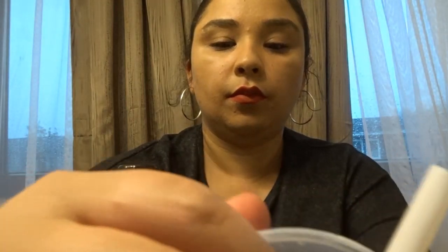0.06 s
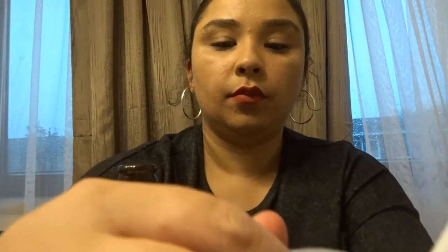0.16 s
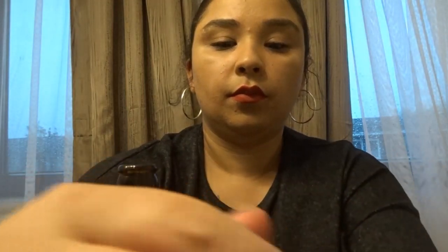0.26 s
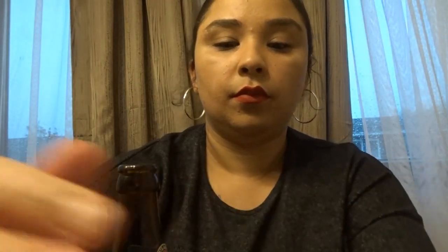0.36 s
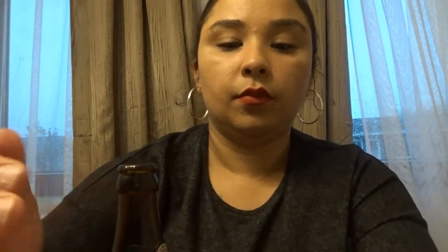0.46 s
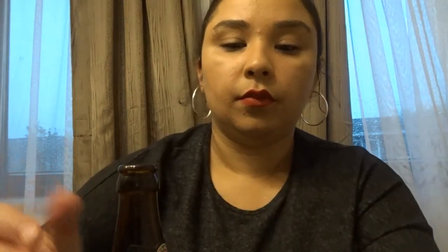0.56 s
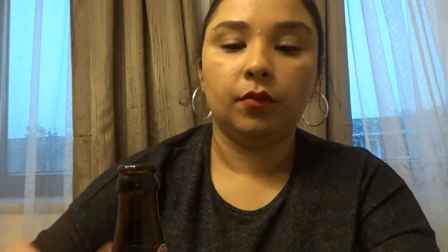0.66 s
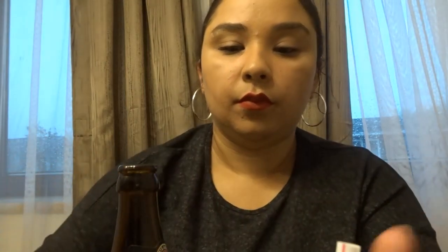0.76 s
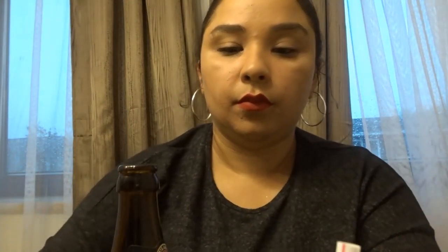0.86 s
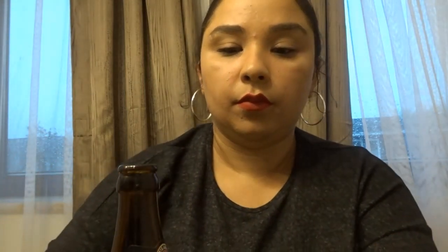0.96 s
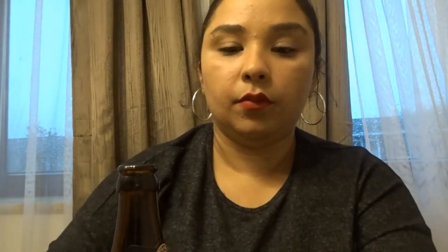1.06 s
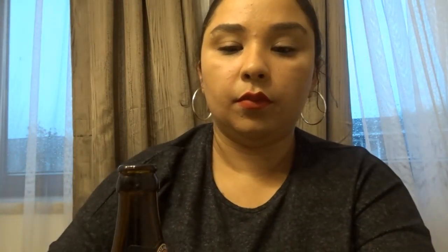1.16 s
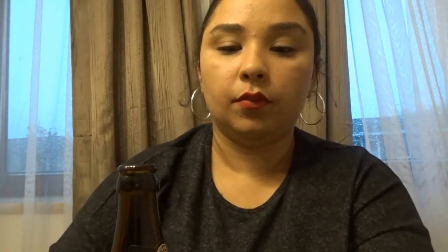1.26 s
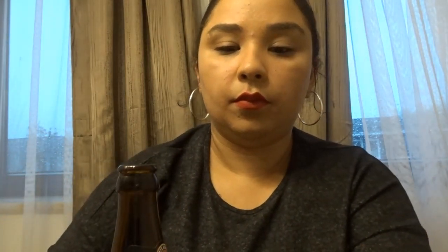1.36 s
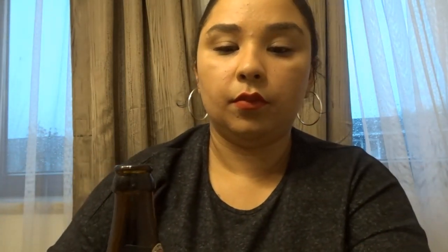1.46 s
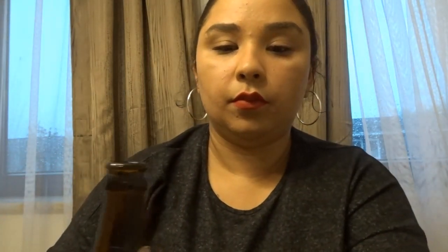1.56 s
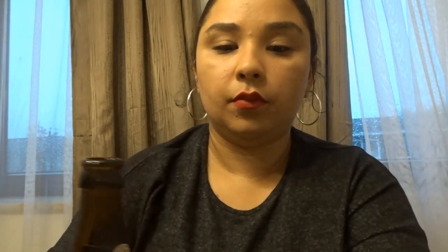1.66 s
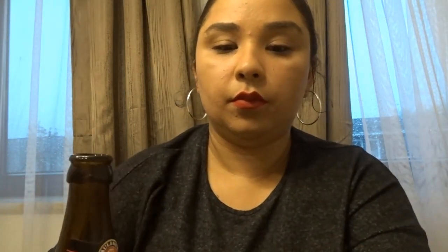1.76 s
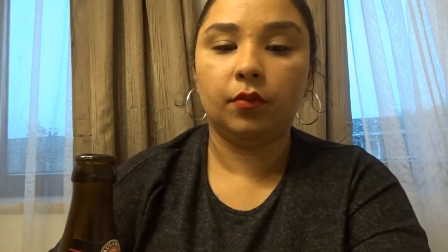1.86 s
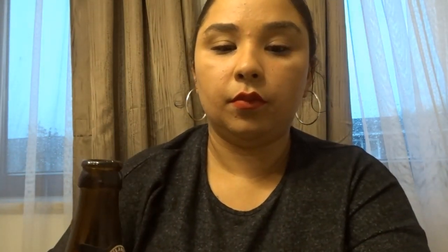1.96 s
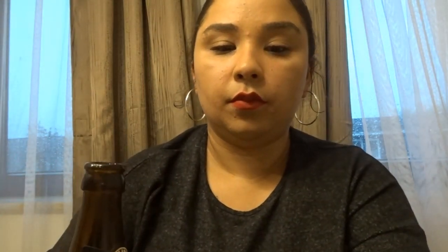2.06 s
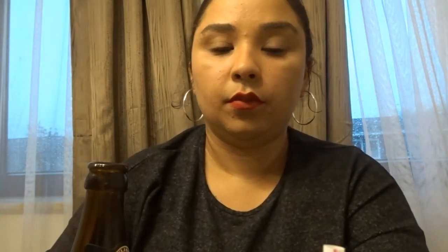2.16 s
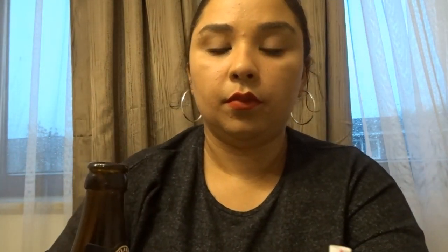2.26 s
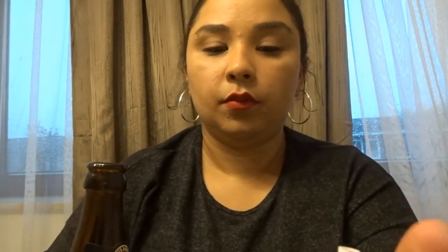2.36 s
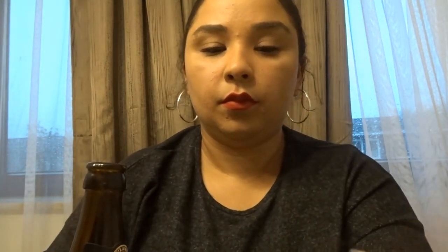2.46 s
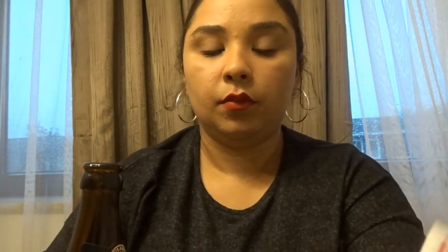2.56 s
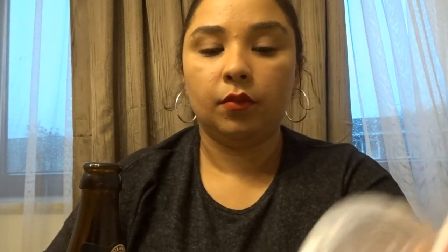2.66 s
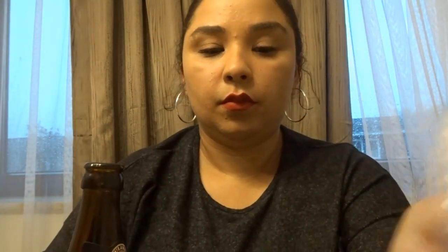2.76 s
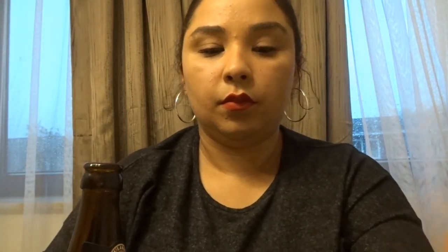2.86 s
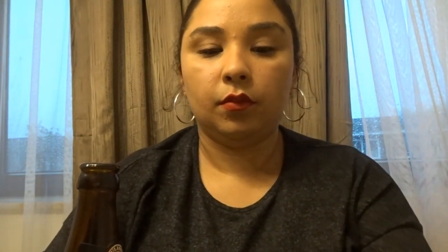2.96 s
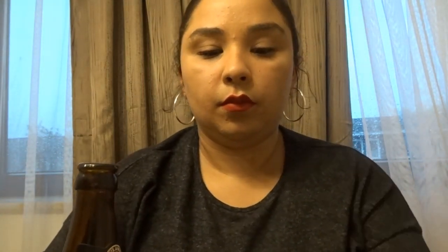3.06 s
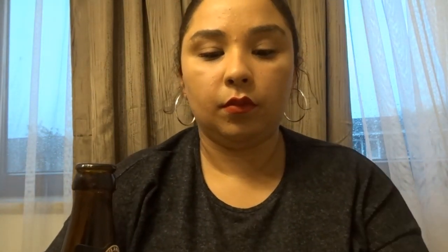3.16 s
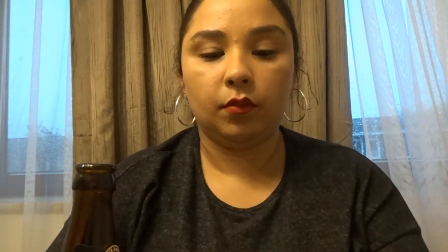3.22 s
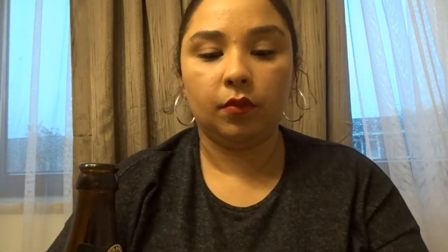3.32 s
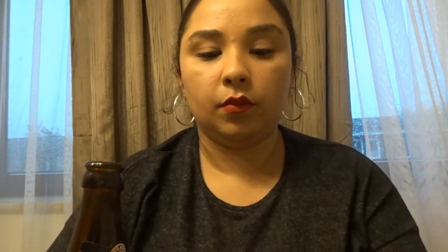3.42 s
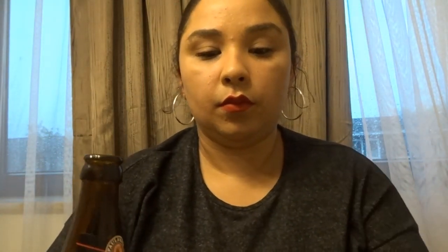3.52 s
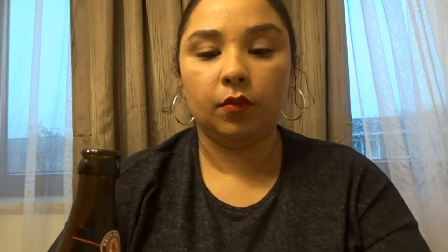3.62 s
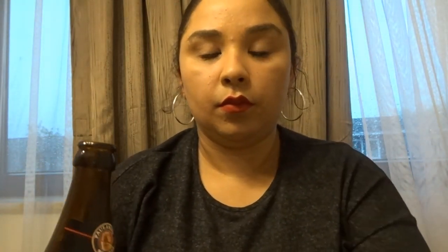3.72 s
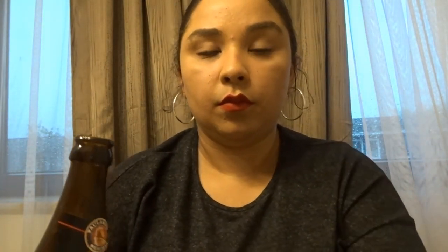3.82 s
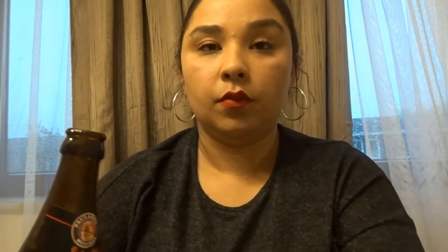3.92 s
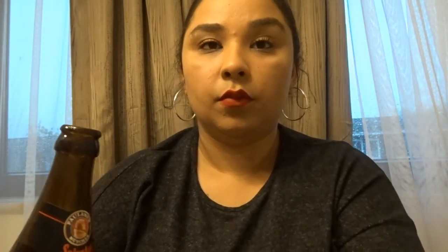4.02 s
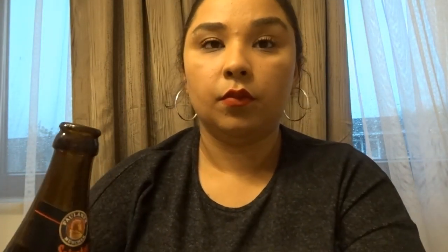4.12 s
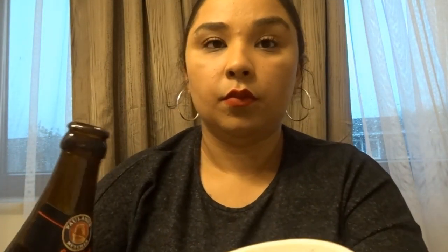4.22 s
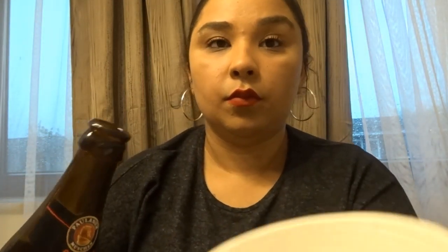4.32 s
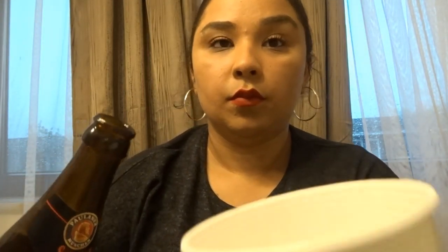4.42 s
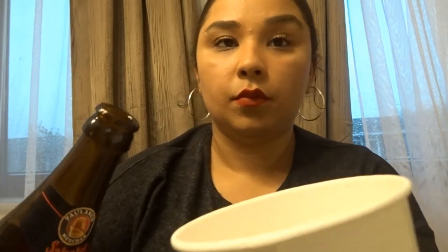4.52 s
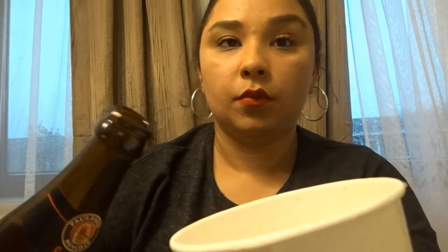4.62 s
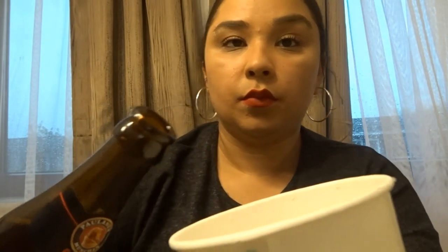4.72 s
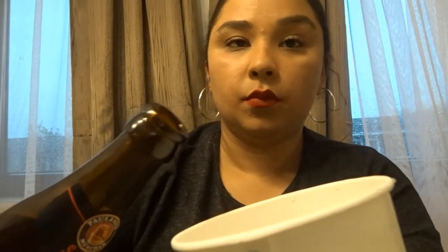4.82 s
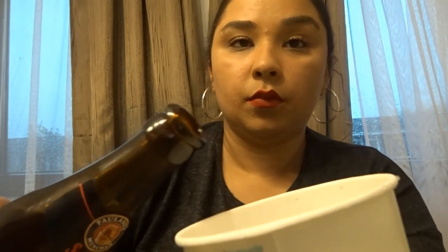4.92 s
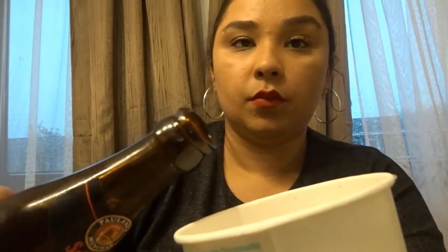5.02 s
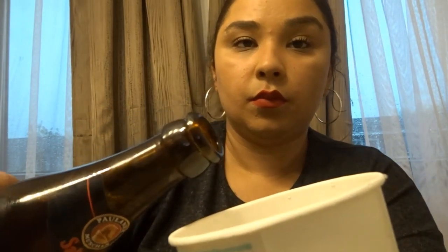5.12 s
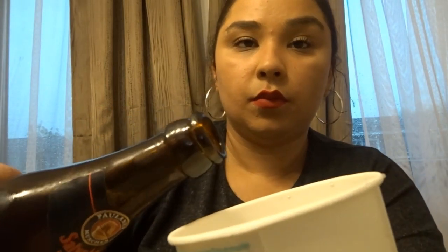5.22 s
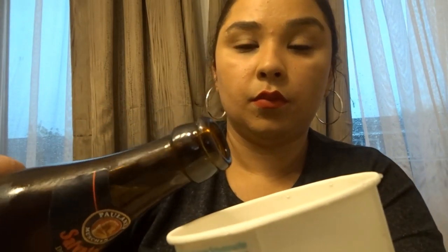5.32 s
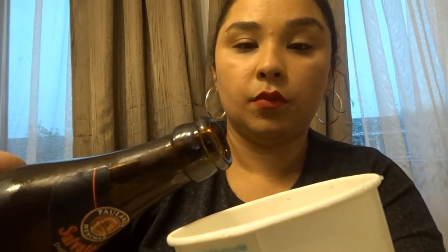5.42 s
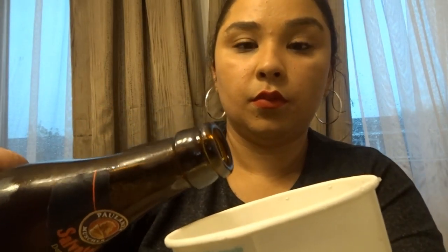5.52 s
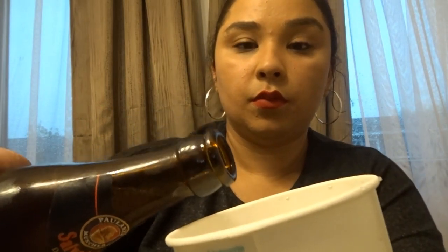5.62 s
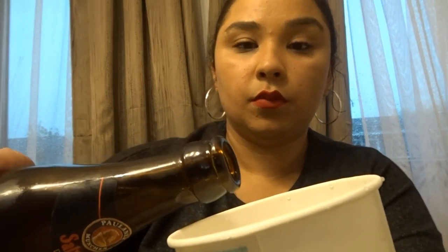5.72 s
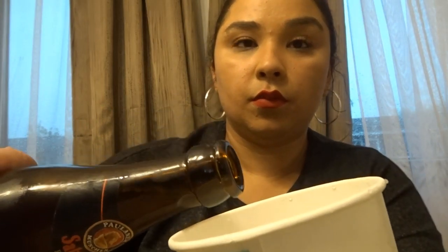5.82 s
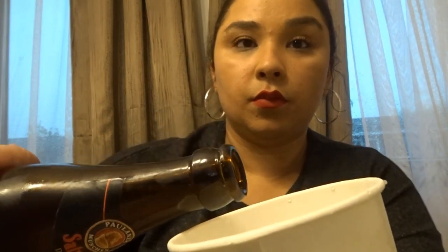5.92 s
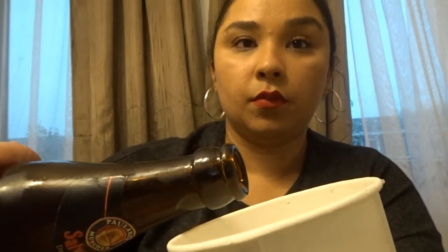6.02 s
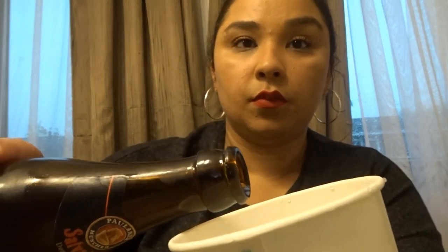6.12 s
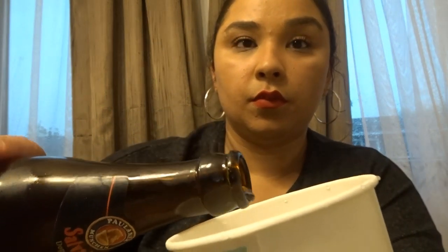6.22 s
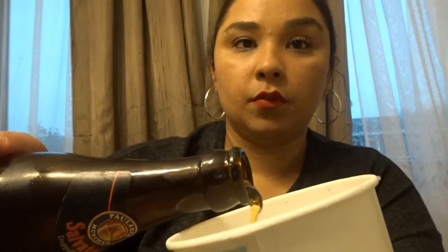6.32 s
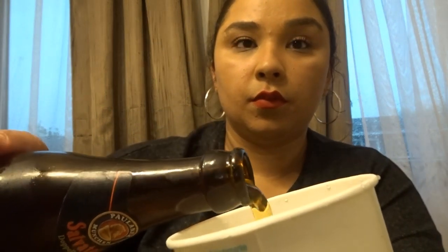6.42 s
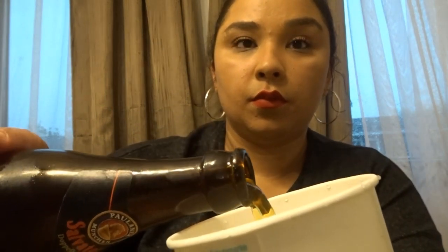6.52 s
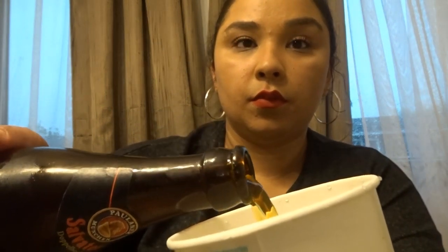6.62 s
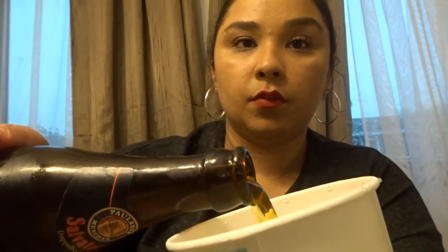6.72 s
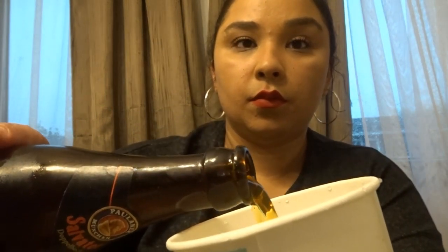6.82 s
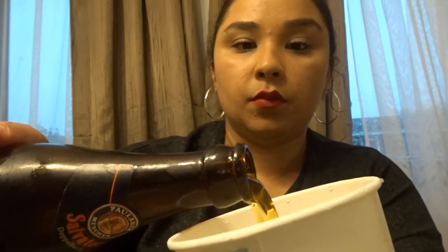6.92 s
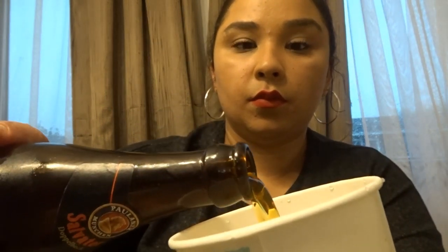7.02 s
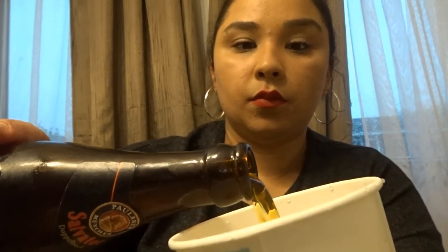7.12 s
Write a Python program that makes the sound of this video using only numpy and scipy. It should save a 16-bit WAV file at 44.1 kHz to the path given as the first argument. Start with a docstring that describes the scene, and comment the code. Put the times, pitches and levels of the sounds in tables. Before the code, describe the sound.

Thin plastic cup clicks and scrapes on a table, a bottle thumps down, a lid clatters, a paper cup creaks, then beer glugs and fizzes in.

```python
"""Clicks and scrapes of a plastic cup, a bottle thumping down, a lid clattering, a paper cup creaking, then beer.
Hard contacts are short bursts of tiny impulses that make a wall ring; scrapes and rubs are longer, uneven trains.
The table top booms under each blow, and an uneven slide hisses over it.
Beer is made of spatter, splashes, bubbles that ring as they rise, gurgles and fizz.
A small room answers, over steady air noise and a low hum."""
import sys
import numpy as np
from scipy import signal
from scipy.fft import rfft, irfft
from scipy.io import wavfile
from scipy.ndimage import uniform_filter1d, minimum_filter1d

SR = 44100
rng = np.random.default_rng(int(sys.argv[2]) if len(sys.argv) > 2 else 0)


def store_pcm(level_fs):
    """Save levels as 16-bit WAV."""
    pcm = np.round(np.clip(level_fs, -1, 1) * 32767).astype(np.int16)
    wavfile.write(sys.argv[1], SR, np.atleast_2d(pcm).T)


N = 316638
T = np.arange(N) / SR  # time in seconds


def plastic_cup():
    """A thin plastic wall rings when it clicks on fingers or table, and grates as it is pushed along."""
    # clicks against fingers and table [t/s, level/dB, treble/dB]
    click_rows = [(0.0919, -33.5, -21), (0.1325, -50, -22), (0.2571, -31.5, 5), (0.271, -20, -2),
                  (0.2925, -21, -25), (0.5308, -29, -4), (0.615, -24.5, -3.5), (0.6574, -31.5, -16),
                  (0.6804, -27.5, -11), (0.7822, -25, -1), (0.9495, -35.5, 5.5), (0.977, -25, -6.5),
                  (1.0735, -24.5, -6.5), (1.0912, -34.5, 4), (1.1355, -33, 4.5), (1.2041, -28.5, -1),
                  (1.2154, -30, 0), (1.2297, -25.5, 6.5), (2.2296, -24.5, 1), (2.4871, -30.5, 11),
                  (2.5036, -17.5, 6.5), (2.5135, -24.5, -3), (2.6121, -22.5, -6), (2.6551, -19.5, -9),
                  (2.6632, -18.5, 2.5), (2.6807, -20, 14.5), (2.8232, -39, 9), (2.891, -43, 14)]
    # pushes along the table [peak t/s, rise/s, fall/s, level/dB, hiss/dB]
    scrape_rows = [(0.04, 0.099, 0.11, -29.5, -47), (0.279, 0.005, 0.15, -23, -41),
                   (0.53, 0.092, 0.21, -29.5, -58), (0.958, 0.009, 0.35, -34.5, -47),
                   (1.21, 0.01, 0.18, -27, -31.5), (2.507, 0.017, 0.041, -20, -26),
                   (2.66, 0.12, 0.068, -20.5, -27)]
    # single tones that stand out after a square landing [t/s, peak/dB, f/Hz]
    tone_rows = [(0.272, -19.5, 790), (0.272, -13.5, 1888), (2.505, -22, 580), (2.561, -18.5, 560),
                 (2.613, -21.5, 544), (2.657, -13.5, 475), (2.66, -14, 261)]
    # dull sound of the wall [f/Hz, level/dB]
    wall_colour = [(35, -64), (60, -23.5), (168, -22), (262, -14), (330, -13), (515, -8.5), (579, 0),
                   (636, -4), (980, -7), (1310, -11.5), (1910, -3.5), (4970, -10.5), (7060, -13.5),
                   (9570, -30), (13300, -34), (16000, -51)]
    # ringing tones of the wall [f/Hz, level/dB, time to fall 60 dB/s]
    wall_modes = [(595, 9, 0.09), (790, -16, 0.019), (970, 1, 0.025), (1660, 15.5, 0.03), (1950, 7, 0.025),
                  (2704, -6, 0.1)]

    grit = grains(1800, spread_db=0.96) * surge(70, depth_db=1.5)
    grit = steady(body(grit, wall_colour, wall_modes, ring_db=-11.5, detune=0.0035))
    scrape = undb(-0.5) * grit * strokes(scrape_rows)
    hiss = undb(-1) * treble(grit, hz=6700) * strokes(scrape_rows, axis=4)

    tones = np.zeros(N)
    tone_t60_s = 0.07
    for s, db, hz in tone_rows:
        add(tones, s, ring([(hz, db, tone_t60_s)], size=12000))

    clicks = blows(click_rows, wall_colour, wall_modes, ring_db=-8.0, snap=0.3, detune=0.013,
                   gain_db=0, chatter_s=0.0075, bass_db=1.0)
    return scrape + hiss + tones + clicks


def table():
    """A heavy contact bends the top once, rattles and leaves it ringing; sliding hisses and groans."""
    # blows on the table [t/s, peak of the push/dB, pitch of the push/Hz, rattle over push/dB]
    thump_rows = [(1.549, -21.5, 270, -8), (1.562, -24, 270, -18), (2.1211, -9.5, 313, -1),
                  (2.1521, -19.5, 292, 1), (2.2205, -12, 269, -0.5), (2.231, -18.5, 325, 8),
                  (2.656, -31, 410, 1)]
    # ringing tones of the table top [f/Hz, level/dB, time to fall 60 dB/s]
    top_modes = [(112.3, -8, 0.98), (168.5, -5.5, 0.39), (248, -3, 0.099), (356, -30, 0.21),
                 (451, -1, 0.17), (560, 6.5, 0.081)]
    # the bottle base rumbles over the table [peak t/s, rise/s, fall/s, level/dB]
    drag_rows = [(1.562, 0.068, 0.1, -21.5), (2.56, 0.071, 0.3, -34)]
    # something smooth slides over the table top [t/s, level/dB]
    slide_rows = [(1.2, -47), (1.67, -44.5), (2.09, -52.5), (2.28, -55.5), (2.7, -42.5), (2.89, -51),
                  (3.11, -52.5), (3.3, -56.5)]
    # the bottle groans as it judders [peak t/s, rise/s, fall/s, level/dB]
    judder_rows = [(2.325, 0.036, 0.065, -33)]
    judder_hz = 295

    push, rattle = np.zeros(N), np.zeros(N)
    t = np.arange(-256, 256) / SR
    rattle_fade = np.exp(-T[:8192] / 0.032)
    for s, db, hz, rattle_db in thump_rows:
        u = (np.pi * hz * t) ** 2
        bend = (1 - 2 * u) * np.exp(-u)  # one hump with a dip on either side
        add(push, s + t[0], undb(db) * bend)
        chatter = unit(grains(3000, spread_db=1.2, size=8192) * rattle_fade)
        add(rattle, s, undb(db + rattle_db) * chatter)
    rattle += undb(-20) * steady(grains(1500, spread_db=1.5)) * strokes(drag_rows)

    boom = undb(-43.0) * through(push, ring(top_modes, size=30000))
    knock_colour = colour([(50, -51), (130, -7.5), (280, 0.0), (540, -7.0), (750, -16), (1200, -23),
                           (1700, -24.0), (3000, -42), (9000, -72)])
    knock = undb(17.5) * through(rattle, unit(knock_colour))

    slide_colour = colour([(600, -4), (1500, -9.5), (2500, -0.5), (3100, -0.5), (3450, -6), (3900, 4),
                           (4400, -2.5), (5500, -9.5), (12000, -24)])
    slide = undb(2.5) * steady(through(grains(6000, spread_db=0.89), slide_colour)) * swell(slide_rows)

    wavering_hz = judder_hz * surge(40, depth_db=0.8)
    groan = np.sin(2 * np.pi * np.cumsum(wavering_hz) / SR) * strokes(judder_rows)
    return push + boom + knock + slide + groan


def lid(dulling_db_per_s=25):
    """Each landing of the lid is softer-edged than the last and is followed by an uneven skitter of its rim."""
    # landings as the lid rattles to rest [t/s, level/dB]
    tap_rows = [(3.304, -29), (3.3494, -20), (3.3647, -21.5), (3.4047, -28), (3.4335, -19), (3.4639, -18.5),
                (3.5022, -25), (3.5301, -24), (3.5635, -33.5)]
    # dull sound of the lid [f/Hz, level/dB]
    lid_colour = [(35, -37), (110, -15.5), (300, -16), (600, -7.5), (980, -4), (1300, -8.5), (1850, 1),
                  (2700, -6), (4200, -9), (7500, -13), (9500, -28), (12500, -21), (16000, -37)]
    # ringing tones of the lid [f/Hz, level/dB, time to fall 60 dB/s]
    lid_modes = [(1010, -8, 0.065), (1837, 2, .06), (2376, -3, .05)]

    first_s = tap_rows[0][0]
    rows = [(s, db, -0.5 - dulling_db_per_s * (s - first_s)) for s, db in tap_rows]
    taps = blows(rows, lid_colour, lid_modes, ring_db=-9.5, snap=0.18, detune=0.012,
                 gain_db=-2.0, chatter_s=0.015, bass_db=2.0)
    skitter = blows(rows, lid_colour, lid_modes, ring_db=-9.0, snap=0, detune=0.02,
                    gain_db=-4.5, chatter_s=0.029, bass_db=-7.0)
    return taps + surge(110, depth_db=4) * skitter


def paper_cup():
    """Fingers stick and slip on the paper wall, which rings together with the air inside."""
    # the wall snaps free of the fingers [t/s, level/dB, treble/dB]
    creak_rows = [(1.7309, -23, -7), (1.7889, -28, -3), (1.8048, -31, 3), (1.9441, -32.5, 0.5),
                  (2.0785, -35.5, 4), (4.0125, -39, 6.5), (4.1076, -35.5, -19), (4.1425, -28, -19),
                  (4.1639, -27, -7), (4.2188, -25, -12), (4.2401, -23.5, -8), (4.289, -26, 9.5),
                  (4.308, -23, 7), (4.3205, -17, 1.5), (4.3255, -14.5, -3.5), (4.3404, -20, 1),
                  (4.4153, -20, -28), (4.4577, -26.5, -8), (4.4702, -33, -20), (4.5821, -40, 8.5),
                  (5.1797, -52.5, 5)]
    # fingers rub the cup; the slow one is the hand settling [peak t/s, rise/s, fall/s, wall/dB, air/dB]
    rub_rows = [(1.61, 0.094, 0.34, -33.5, -39), (1.73, 0.036, 0.1, -31.5, -24.5),
                (2.05, 0.5, 0.14, -40.5, -41), (4.03, 0.22, 0.83, -40.5, -61),
                (4.165, 0.098, 0.12, -29, -30), (4.32, 0.21, 0.14, -23.5, -46),
                (4.42, 0.092, 0.078, -21, -25)]
    # dull sound of the paper [f/Hz, level/dB]
    paper_colour = [(300, -29.5), (450, -16), (600, -4.5), (800, -12), (1300, -21), (1650, -5.5),
                    (2300, -9), (2850, -4), (3250, -1), (3560, -16), (4100, -7.5), (7000, -16),
                    (12000, -33), (16000, -49)]
    # ringing tones of the paper [f/Hz, level/dB, time to fall 60 dB/s]
    paper_modes = [(600, -2, 0.06), (2200, 2, 0.025), (2814, 13, 0.026), (3110, -4, 0.072),
                   (4100, -6.5, 0.023)]
    # the air inside the cup [f/Hz, level/dB, time to fall 60 dB/s]
    air_modes = [(600, 0, 0.063)]

    slips = grains(1100, spread_db=3.3) * surge(55, depth_db=4)
    wall = undb(-0.5) * steady(body(slips, paper_colour, paper_modes, ring_db=-8.5, detune=0.003))
    puffs = grains(2500, spread_db=3.6) * surge(35, depth_db=5)
    air = undb(-3.0) * steady(through(puffs, ring(air_modes, size=4096)))
    rub = wall * strokes(rub_rows) + air * strokes(rub_rows, axis=4)

    creaks = blows(creak_rows, paper_colour, paper_modes, ring_db=2.0, snap=0.16, detune=0.011,
                   gain_db=-0.5, chatter_s=0.0075, bass_db=-3)
    # the paper sounds neither in the deep bass nor at the very top
    soft = signal.butter(2, [180, 9000], "band", fs=SR, output="sos")
    return signal.sosfilt(soft, rub + creaks)


def pour(count=170):
    """The stream spatters in the cup, traps bubbles, pumps the air column and fizzes."""
    # the stream swells and then runs on [t/s, level/dB]
    flow_rows = [(6.57, -47), (6.665, -25.5), (6.72, -22.5), (6.85, -26), (7.1, -24.5), (7.18, -19.5)]
    # the stream breaks on the cup [t/s, level/dB]
    splash_rows = [(6.508, -48), (6.565, -32), (6.59, -32), (6.6111, -24), (6.644, -20.5), (6.6764, -22),
                   (6.693, -19), (6.748, -15.5), (6.7809, -18.5), (6.8238, -23), (6.875, -14.5),
                   (6.9042, -14), (7.0195, -22), (7.0539, -22.5), (7.157, -16), (7.1731, -14.5)]
    # large bubbles [t/s, level/dB, f/Hz]
    bubble_rows = [(6.61, -13, 2260), (6.8003, -11.5, 2250), (6.824, -13.5, 1680), (6.9163, -12.5, 1480),
                   (6.986, -10.5, 1890), (7.0948, -15, 1670)]
    # slugs of beer pump the air in the cup [t/s, level/dB, f/Hz]
    gulp_rows = [(6.654, -19, 595), (6.746, -32, 677), (6.826, -16, 603), (6.988, -20.5, 600),
                 (7.047, -20, 587), (7.143, -16.5, 595)]
    # the first beer foams up on the dry bottom [peak t/s, rise/s, fall/s, level/dB]
    foam_rows = [(6.685, 0.04, 0.11, -31)]
    # dull sound of the wet cup [f/Hz, level/dB]
    beer_colour = [(120, -37), (200, -34), (353, -29.5), (509, -15), (590, 6), (777, -7.5), (1100, -14.5),
                   (1680, -7), (2090, -2), (3130, 7), (3620, -2.5), (6760, -7.5), (10300, -24),
                   (14600, -32), (16000, -54)]
    # ringing tones of the wet cup [f/Hz, level/dB, time to fall 60 dB/s]
    wet_modes = [(603, -1.5, 0.043), (1693, 13, 0.048), (2300, -7, .03), (2805, 12.5, 0.035),
                 (3100, 0, 0.032), (6500, -9, .012)]

    drops = grains(1700, spread_db=4.3) * surge(70, depth_db=3.8)
    spatter = steady(body(drops, beer_colour, wet_modes, ring_db=-7, detune=0.0026))

    start = flow_rows[0][0]
    length = T[-1] - start
    small, large = np.zeros(N), np.zeros(N)
    for when, pitch, strength in rng.random((count, 3)):
        gain = undb(14 * strength - 9 * pitch)  # higher bubbles are weaker
        add(small, start + when * length, gain * bubble(1750 * 3.2 ** pitch, cycles=4.2, rise=0.023))
    small = unit(small) * np.sqrt(SR * length)  # rms 1 while the beer runs
    for s, db, hz in bubble_rows:
        add(large, s, undb(db + 2.0) * bubble(hz, cycles=5.6, rise=0.0071))
    for s, db, hz in gulp_rows:
        add(large, s, undb(db - 0.5) * bubble(hz, cycles=6.7, rise=0.0075))

    fizz_colour = colour([(5000, 1), (7500, 0.5), (9500, -10), (13000, -9.5), (16000, -14)])
    fizz = treble(through(grains(3300, spread_db=8.3), fizz_colour), hz=5500)
    water = spatter + undb(-6.5) * small * surge(35, depth_db=3) + undb(-15.5) * gurgle(start, length)
    stream = (water + undb(-28) * fizz) * swell(flow_rows) + fizz * strokes(foam_rows)

    # every large bubble is born in a splash of its own
    rows = [(s, db, 0) for s, db in splash_rows] + [(s, db - 11.5, -4) for s, db, hz in bubble_rows]
    splashes = blows(rows, beer_colour, wet_modes, ring_db=-17, snap=0.16, detune=0.032,
                     gain_db=-5.0, chatter_s=0.0052, bass_db=-1.5)
    # so small a cup radiates little bass, well below its air resonance
    small_cup = signal.butter(3, 85, "high", fs=SR, output="sos")
    return signal.sosfilt(small_cup, stream + large + splashes)


def gurgle(start, length, count=40):
    """Small slugs set the air in the cup ringing at ever-changing pitches."""
    centre_hz, spread_octaves = 630, 0.23  # spread to either side
    out = np.zeros(N)
    for when, pitch, strength in rng.random((count, 3)):
        hz = centre_hz * 2 ** (spread_octaves * (2 * pitch - 1))
        add(out, start + when * length, undb(8 * strength) * bubble(hz, cycles=3.7, rise=0.0064))
    return unit(out) * np.sqrt(SR * length)


def bubble(hz, cycles, rise):
    """A bubble rings for some cycles, its pitch rising as it nears the surface."""
    turn = np.arange(int(6 * cycles * SR / hz)) * hz / SR  # cycles passed at the starting pitch
    fade = np.exp(-turn / cycles) * (1 - np.exp(-2 * turn))
    return fade * np.sin(2 * np.pi * turn * (1 + rise * turn / cycles))


def blows(rows, spectrum, modes, ring_db, snap, detune, gain_db, chatter_s, bass_db, patchy_db=1.5, size=6000):
    """Each blow is a snap and a dying chatter of small contacts; its treble sets how hard it sounds."""
    out, t = np.zeros(N), np.arange(size) / SR
    for s, db, treble_db in rows:
        force = unit(grains(9000, spread_db=3.13, size=size) * np.exp(-t / chatter_s))
        force[0] += snap
        tilt = [(900, bass_db), (1400, 0.0016), (4000, 0.0036), (6500, treble_db), (13000, 1.1 * treble_db)]
        # each spot has its own colour
        patchy = [(hz, gain + patchy_db * rng.standard_normal()) for hz, gain in tilt]
        force = through(force, colour(patchy))
        hit = unit(body(force, spectrum, modes, ring_db, detune))
        add(out, s, undb(db + gain_db) * hit * np.sqrt(SR / 50))  # level as if spread over 20 ms
    return out


def body(x, spectrum, modes, ring_db, detune):
    """A thin wall: a broad dead response plus its ringing modes."""
    dead = through(x, unit(colour(spectrum)))
    ringing = through(x, unit(ring(modes, 4096, detune)))
    return dead + undb(ring_db) * ringing


def ring(modes, size, detune=0):
    """Tones that die away, each shifted in pitch by a small random share when detune is set."""
    t = np.arange(size) / SR
    out = np.zeros(size)
    for hz, db, t60 in modes:
        shifted_hz = hz * (1 + detune * rng.standard_normal())
        out += undb(db - 60 * t / t60) * np.cos(2 * np.pi * shifted_hz * t)
    return out


def grains(rate, spread_db, size=N):
    """Tiny impulses at random moments, about rate of them a second, of uneven size and random sign."""
    sizes = undb(spread_db * np.minimum(rng.exponential(size=size), 4))
    return (rng.random(size) < rate / SR) * sizes * rng.choice([-1, 1], size)


def surge(rate, depth_db):
    """Uneven gain, as of a contact that grips and lets go: random steps, rate a second, smoothed."""
    step = int(SR / rate)
    steps = np.repeat(rng.standard_normal(N // step + 1), step)[:N]
    return undb(depth_db * uniform_filter1d(steps, step // 2))


def strokes(rows, axis=3):
    """Gain of strokes that swell to a peak and die away, by 20 dB per rise or fall time; axis picks the level."""
    power = np.zeros(N)
    for row in rows:
        peak_s, rise_s, fall_s = row[:3]
        db = row[axis] - 20 * np.maximum((peak_s - T) / rise_s, (T - peak_s) / fall_s)
        power += undb(np.maximum(db, -150)) ** 2
    return np.sqrt(power)


def swell(rows):
    """Gain over time from a dB column; silent outside its rows but for 10 ms fades."""
    s, db = np.transpose(rows)
    gate = np.interp(T, [s[0] - 0.01, s[0], s[-1], s[-1] + 0.01], [0, 1, 1, 0])
    # with the last row at the end of the sound, the fade out may fall beyond it
    return undb(np.interp(T, s, db)) * gate


def nearby(size=2048):
    """Dense first reflections from table and hands: noise that dies away fast."""
    return unit(rng.standard_normal(size) * np.exp(-T[:size] / 0.007))


def spot():
    """How far the sound favours one port: a random balance that changes about 99 times a second."""
    return np.log(surge(99, depth_db=9.0))


def place(x, lag, pan_db):
    """The left port hears a source lag samples later than the right, and pan_db louder."""
    late = np.exp(-1j * np.pi * lag * np.fft.rfftfreq(N))  # half the lag on each side
    left = undb(pan_db / 2) * irfft(rfft(x) * late, N)
    right = undb(-pan_db / 2) * irfft(rfft(x) / late, N)
    return np.array([left, right])


def echo(size=32768):
    """Diffuse room response: noise in bands, each dying at its own rate."""
    # bands of the room [f/Hz, echo level/dB, time to fall 60 dB/s]
    room_bands = [(119, -16.5, 1), (296, -6.5, 0.55), (698, -8, 0.43), (1830, -10, 0.54), (4470, -12, 0.63),
                  (10400, -6.5, 0.56)]
    t, hz = np.arange(size) / SR, np.fft.rfftfreq(size, 1 / SR)
    noise, out = rfft(rng.standard_normal(size)), np.zeros(size)
    for centre, db, t60 in room_bands:
        share = read([(row[0], row[0] == centre) for row in room_bands], hz)  # 1 here, 0 at the next bands
        fade = np.exp(-np.log(1000) * t / t60) * (1 - np.exp(-t / 0.0009))
        out += undb(db) * irfft(noise * share) * unit(fade)
    return out


def room_tone():
    """Steady air noise with a few humming resonances, all made by shaping the spectrum of noise."""
    # colour of the air noise [f/Hz, level/dB]
    air_colour = [(15, -55.5), (25, -26), (185, -9.5), (223, -11.5), (317, -6.5), (416, -11), (451, -4.5),
                  (545, -12), (641, -12.5), (1440, -19), (1890, -18.5), (2220, -17), (2840, -21.5),
                  (14400, -30), (16000, -54)]
    # narrow bands of hum [f/Hz, width/Hz, level/dB]
    hum_rows = [(89.5, 24, -77.5), (193, 11.53, -76), (556, 62, -60), (1680, 50, -75)]
    hz = np.fft.rfftfreq(N, 1 / SR)
    air = irfft(rfft(rng.standard_normal(N)) * undb(read(air_colour, hz)), N)
    out = undb(-57) * steady(air)
    for centre, width, db in hum_rows:
        peak = 1 + (2 * (hz - centre) / width) ** 2
        out += undb(db) * steady(irfft(rfft(rng.standard_normal(N)) / peak, N))
    return out


def undb(db):
    """Decibels to gain."""
    return 10 ** (np.asarray(db) / 20)


def unit(x):
    """Scale to an energy of 1."""
    return x / np.sqrt(np.sum(x ** 2) + 1e-18)


def steady(x):
    """Scale to an rms of 1."""
    return unit(x) * np.sqrt(len(x))


def treble(x, hz):
    """Keep what lies above a frequency, at rms 1."""
    return steady(signal.sosfilt(signal.butter(4, hz, "high", fs=SR, output="sos"), x))


def read(points, hz):
    """A spectrum's value at any frequency, between points on a log scale."""
    f, value = np.transpose(points)
    return np.interp(np.log(hz + 1), np.log(f), value)


def colour(points, size=2048):
    """Impulse response with a given spectrum that starts at once, found by way of its cepstrum."""
    cepstrum = irfft(np.log(undb(read(points, np.fft.rfftfreq(size, 1 / SR)))))
    cepstrum[1:size // 2] *= 2  # fold the half before time zero onto the half after it
    cepstrum[size // 2 + 1:] = 0
    return irfft(np.exp(rfft(cepstrum)))


def through(x, response):
    """Pass a sound through an impulse response."""
    return signal.fftconvolve(x, response)[:len(x)]


def add(track, s, sound):
    """Mix a sound in at a time in seconds."""
    i = max(int(s * SR), 0)
    track[i:i + len(sound)] += sound[:max(N - i, 0)]


def scene():
    """Two close ports hear nearly the same bass; shifting contacts, reflections and room set their treble apart."""
    # difference between the ports over what they share [f/Hz, level/dB]
    width_colour = [(30, -15.5), (120, -13.5), (500, -13.5), (1000, -4.5), (2200, -6), (4200, 0.5),
                    (8000, 1), (16000, -8.5)]
    close = plastic_cup() + table() + paper_cup() + pour()
    aside = lid()  # dropped to one side
    direct = place(close, lag=1.0, pan_db=-0.3) + place(aside, lag=3.8, pan_db=-4.0)
    send = close + undb(5.0) * aside  # the lid lies further off, so more of it is room

    reflections = sum(through(close * spot(), nearby()) for _ in range(2))
    early = undb(-15.0) * reflections + undb(-13.5) * close * spot()
    mid = through(send, echo()) + room_tone()
    apart = early + undb(-2.5) * through(send, echo()) + undb(5.0) * room_tone()
    side = through(apart, colour(width_colour))
    return direct + np.array([mid + side, mid - side])


def record(dry):
    """A quick limiter holds peaks under full scale, then the top is cut."""
    top_hz = 15800
    room_left = np.minimum(1, 0.93 / (np.abs(dry).max(axis=0) + 1e-9))
    gain = uniform_filter1d(minimum_filter1d(room_left, size=129), size=129)
    top_cut = signal.ellip(8, 0.2, 70, top_hz, fs=SR, output="sos")
    return signal.sosfilt(top_cut, dry * gain)


dry = scene()
out = record(dry)
store_pcm(out)
```